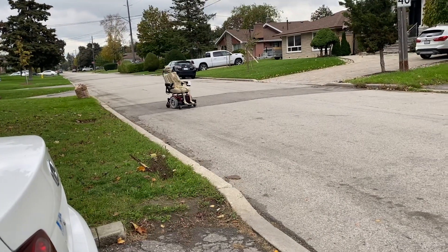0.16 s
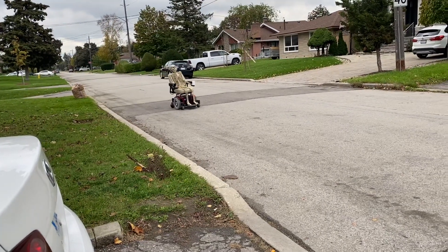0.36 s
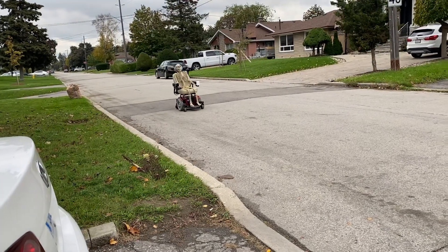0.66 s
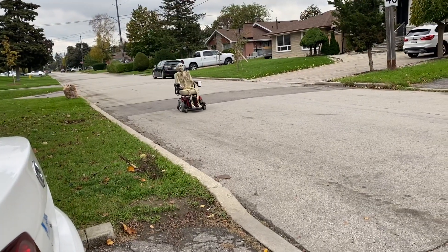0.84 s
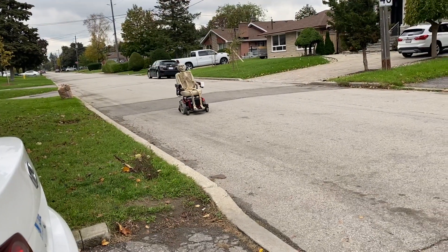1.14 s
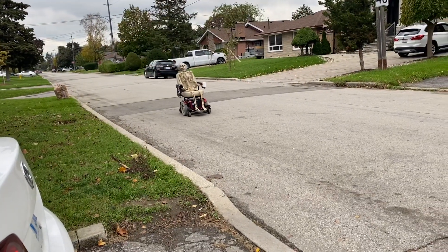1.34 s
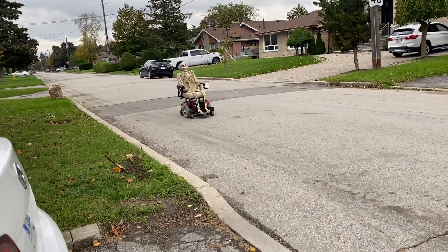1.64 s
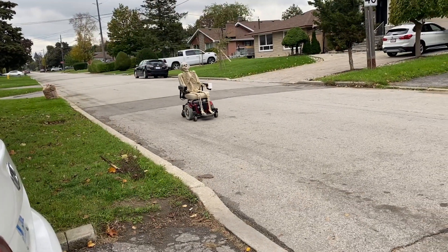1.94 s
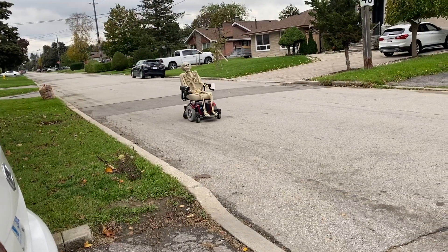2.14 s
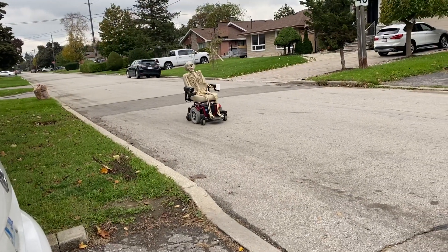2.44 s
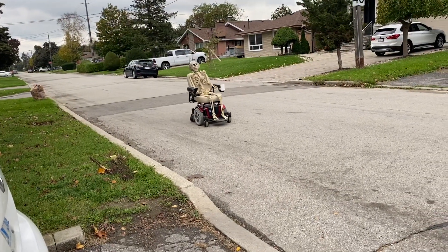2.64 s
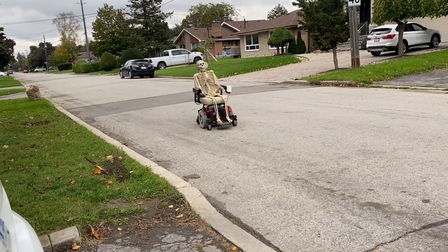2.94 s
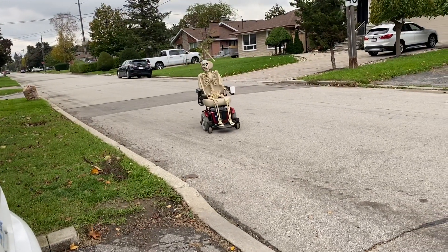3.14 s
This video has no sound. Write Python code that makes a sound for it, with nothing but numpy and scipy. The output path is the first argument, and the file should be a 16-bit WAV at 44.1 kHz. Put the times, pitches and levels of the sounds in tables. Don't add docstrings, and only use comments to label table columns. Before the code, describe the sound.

Two quick clusters of dry plastic ticks and hollow knocks near the microphone in the first second, then only soft wind rumble, distant traffic drone and a slowly nearing electric wheelchair's faint hiss and hum outdoors.

```python
import sys
import numpy as np
from scipy import signal
from scipy.io import wavfile
from scipy.ndimage import uniform_filter1d

SR = 44100
rng = np.random.default_rng(int(sys.argv[2]) if len(sys.argv) > 2 else 0)


def rack_gain(trim_db):
    fader = np.asarray(trim_db, float)
    return 10 ** (fader / 20)


def wav_record(signal):
    frames = np.transpose(np.atleast_2d(signal))
    bounded = np.clip(frames, -1, 1)
    quanta = np.round(bounded * 32767).astype(np.int16)
    wavfile.write(sys.argv[1], SR, quanta)


N = 145089

# time in seconds, level in dB.
TRAFFIC_LEVEL = [(0.0, -52), (0.82, -52), (1.48, -53.5), (1.88, -53), (2.5, -53.5), (3.29, -51.5)]
# frequency in Hz, level in dB per Hz.
TRAFFIC_CENTRE = [(180, 3.5), (300, -5), (365, -3), (564, -6), (609, -5), (806, -5), (878, -5.5),
                  (1550, -17.5), (2300, -18.5), (2990, -17), (5060, -120)]
TRAFFIC_SIDE = [(180, -16), (300, 1.5), (436, 2), (728, 8), (893, 3), (964, 13.5), (1040, -5.5), (1160, 3),
                (2300, -11.5), (2990, -47), (5060, -120)]

# time in seconds, level in dB.
WIND_LEVEL = [(0.0, -40), (0.15, -47.5), (0.48, -44.5), (0.66, -45.5), (0.8, -40), (0.9, -47), (1.1, -45),
              (1.43, -47), (2.06, -47), (2.35, -44.5), (2.6, -43.5), (2.99, -43.5), (3.29, -43.5)]
# frequency in Hz, level in dB per Hz.
RUMBLE_CENTRE = [(12, -45), (20, -18), (49, 0), (71, 2.5), (135, -4), (157, -12.5), (203, -11),
                 (290, -21.5), (420, -19.5), (550, -74), (920, -120)]
RUMBLE_SIDE = [(12, -51), (20, -26), (54, -4), (124, 5), (193, -4), (225, -21), (276, -2), (313, -18),
               (420, -18), (550, -23), (920, -120)]
# centre in seconds, peak in dB, pitch in Hz, length in cycles.
PUFFS = [(0.027, -24, 161, 1.2), (0.067, -37, 197, 1.8), (.085, -34.5, 77, 1.9), (0.128, -36.5, 124, 1.5),
         (0.144, -26.5, 130, 1.4), (.18, -26, 112, 1.4), (0.196, -34.5, 70, 1.4), (0.337, -33, 169, 2.1),
         (0.546, -32, 75, 0.28), (0.706, -38, 70, 1.8), (0.729, -30.5, 136, 3), (0.752, -30.5, 176.5, 2.8),
         (.72, -35, 203, 3.1), (.738, -41, 121, 1.4), (.79, -39.5, 190, 1.9), (.825, -37.5, 230, 3),
         (.808, -39, 76, 2), (.66, -40.5, 202, 2), (.775, -35.5, 140, 1.7), (.745, -33.5, 212, 1.7),
         (.4, -38, 120, 1.9), (0.767, -35.5, 64.4, 4.5), (0.821, -37, 110, 1.1), (0.843, -32, 138, 0.72),
         (1.149, -29, 114, 1.24), (1.181, -35, 81.2, 1.2), (1.289, -30.5, 154, 1.8), (1.46, -36.5, 97, 2),
         (2.015, -35.5, 105.4, 3), (2.166, -39, 91.3, 8), (2.309, -38, 72.3, 7.8),
         (2.789, -34.5, 67.6, 2.2), (3.005, -34.5, 92, 2.6), (3.039, -36.5, 123, 5), (3.062, -35, 88, 2.4),
         (3.12, -35, 66.2, 2.2), (3.14, -38, 124, 3), (2.809, -31, 90, 1.23), (2.93, -37, 65, 2.6),
         (3.22, -35.5, 53, 1.7)]
PUFF_SAG, PUFF_SIDE_DB = 0.43, -14.5
STEADY = 0.73
FLUTTER_HZ, FLUTTER_WIDTH_HZ, FLUTTER_DB, FLUTTER_END_S = 250, 180, -54, 0.96

# time in seconds, level in dB.
CHAIR_LEVEL = [(0.0, -61.5), (1.63, -61), (3.07, -59), (3.29, -59.5)]
# frequency in Hz, level in dB per Hz.
TYRES_CENTRE = [(1300, -52), (1800, -9), (2600, -3.5), (2950, -9.5), (3250, -2), (3700, -2.5), (5100, -3.5),
                (5450, -6.5), (5900, -4.5), (7600, -11.5), (9000, -62)]
TYRES_SIDE = [(1060, -42), (1800, -20), (2460, -6), (3130, 1), (3940, -6), (4370, -3.5), (5830, -8),
              (6780, -9), (7600, -21), (9880, -75), (16700, -120)]
# frequency in Hz, level in dB per Hz.
GRIT_CENTRE = [(5500, -32), (7000, -3), (8620, -10), (9640, -1), (11800, -2.5), (12500, -14), (13000, -45),
               (14250, -40), (14600, -3), (15800, -5)]
GRIT_SIDE = [(4120, -28), (7000, -9), (8410, -0.5), (9680, -6), (10400, -27), (11200, -59), (11700, -11),
             (13600, -8.5), (15300, -20)]
GRIT_DB, GRIT_GROWTH = -8.5, 2.1
# time in seconds, pitch in Hz, level in dB.
HUM = [(0.0, 133.4, -51), (0.37, 139.4, -67), (0.42, 134.5, -48), (1.75, 132.8, -50.5),
       (3.12, 132.5, -47.5), (3.29, 130.5, -48)]
HUM_WIDTH_HZ, HUM_SIDE_DB, HUM_DB = 9.9, -14.5, -2

# frequency in Hz, share from -1 to 1.
LEAN = [(60, 0.25), (170, 0.027), (300, -0.088), (2700, -0.071), (4000, 0.17), (5700, 0.69), (8300, -.05),
        (15000, -0.13)]
# frequency in Hz,
# share.
SKEW = [(60, -1.2), (170, -0.25), (340, -0.23), (680, -0.82), (1000, -0.26), (1300, 0.24),
        (1900, -0.39), (2800, 0.18),
        (4000, -0.11), (5250, 0.51), (6100, -0.34), (7700, -.25), (9300, 0.76), (10400, -0.0078),
             (12100, -0.89), (12800, 0.08)]
TOP_HZ, TOP_DB, TOP_SAG_DB, TOP_FLUTTER_DB = 13000, -4.5, 3.5, 1.2

# start in seconds, peak in dB, length in seconds, brightness in dB, left-right in dB.
TICKS = [
    (0.503, -49, .003, -19, -5),
    (0.5205, -49, 0.0038, -21, 5),
    (0.53, -35, 0.0065, -6, 1),
    (0.532, -37, 0.0036, -3, 11),
    (0.643, -42.5, 0.0044, -6, 1),
    (0.714, -43, 0.013, -16, 2),
    (0.877, -35, 0.0064, -1.5, 6.5),
    (0.883, -42, 0.0021, -25, 4),
    (0.896, -47, 0.0029, -1, 2),
    (0.909, -39, 0.01, -15, 3),
]
# frequency in Hz, width in Hz, level in dB.
SHELL = [(2850, 235, 11), (3740, 420, 13), (4940, 520, -17), (6430, 500, 9.5), (9240, 1600, 7),
         (12000, 630, 0), (14800, 2100, -16), (4350, 3000, 6.5)]
BRIGHT_HZ = 5500
SHELL_SPREAD, SHELL_SIDE_SPREAD, TICK_SIDE_DB = 1.5, 3, -4
# start in seconds, peak in dB, length in seconds, upper ring in dB.
KNOCKS = [
    (0.513, -37.5, 0.025, -4),
    (0.54, -36, 0.014, -3.5),
    (0.881, -37, 0.013, -7),
    (0.891, -33.5, 0.035, 0.5),
    (0.907, -38, 0.017, 4),
    (0.925, -34.5, 0.01, -5.5),
]
# frequency in Hz, width in Hz, level in dB.
HOLLOW = [(336, 224, 3), (570, 240, -1.5), (763, 310, -3.5), (1076, 170, 1)]
KNOCK_SIDE = 0.55
# start in seconds, peak in dB, pitch in Hz, T60 in seconds.
PINGS = [(.5055, -45, 3600, .008), (.5205, -40, 3870, .012), (.5298, -40, 3663, .03),
         (.5318, -32.5, 3650, .012), (.8765, -49, 6400, .012), (.644, -54, 9400, 0.013),
         (0.903, -31, 380, 0.017), (0.9059, -37, 445, 0.017), (0.918, -33, 350, .025),
         (.909, -39, 805, 0.028), (.5343, -42, 4320, .01), (.536, -46, 3000, 0.014),
         (.56, -51, 2680, 0.049), (.716, -46, 2750, 0.024), (.8785, -39, 3980, .01), (.880, -48, 4730, .01),
         (.887, -47, 3630, .012), (.9105, -44, 3840, .012), (.911, -48, 4500, .01),
         (.5335, -25.5, 328, 0.031), (.896, -29.5, 369, 0.037), (.929, -36, 320, 0.022)]
PING_RISE_CYCLES, PING_SIDE = 1.1, 0.4
DULL_CUT = signal.butter(10, 12700, fs=SR, output="sos")

LOW_EDGE_HZ, HIGH_EDGE_HZ = 33, 15720


def evened(x):
    return x / np.sqrt(np.mean(x ** 2) + 1e-20)


def read(points, hz):
    f, value = np.transpose(points)
    return np.interp(np.log(hz + 1), np.log(f + 1), value)


def curve(rows, column=1):
    rows = np.array(rows)
    return np.interp(np.arange(N) / SR, rows[:, 0], rows[:, column])


def add(mix, s, sound):
    part = mix[:, max(round(s * SR), 0):][:, :sound.shape[1]]
    part += sound[:, :part.shape[1]]


def ports(centre, side):
    return np.array([centre + side, centre - side])


def ring(x, hz, width):
    turn = np.exp(2j * np.pi * np.cumsum(hz * np.ones(len(x))) / SR)
    r = np.exp(-np.pi * width / SR)
    return 2 * (turn * signal.lfilter([1 - r], [1, -r], x / turn)).real


def double_ring(x, hz, width):
    return ring(ring(x, hz, width), hz, width)


def bed(centre, side, side_db, patchy_db, flicker_db, size):
    hop = size // 4
    frames, hz = N // hop + 5, np.fft.rfftfreq(size, 1 / SR)
    a, b, c, d, patches = rng.standard_normal((frames, len(hz), 5)).T
    patches = uniform_filter1d(patches, size=size // 80, axis=0)
    patches = evened(uniform_filter1d(patches, size=3000 // hop, axis=1))
    flicker = evened(uniform_filter1d(rng.standard_normal(frames), size=3))

    lean = (read(LEAN, hz) + 1j * read(SKEW, hz))[:, None]
    mid = a + 1j * b
    own = np.sqrt(np.maximum(1 - abs(lean) ** 2, 0)) * (c + 1j * d)
    z = np.array([mid, lean * mid + own])

    inside = [(hz >= s[0][0]) & (hz <= s[-1][0]) for s in (centre, side)]
    colour = rack_gain([read(centre, hz), read(side, hz)]) * inside
    z *= colour[:, :, None] * rack_gain(patchy_db * patches + flicker_db * flicker)
    flutter = evened(uniform_filter1d(rng.standard_normal(frames), size=16))
    sag = TOP_SAG_DB * np.linspace(-.5, .5, frames)
    z[0, hz > TOP_HZ] *= rack_gain(TOP_DB - sag + TOP_FLUTTER_DB * flutter)
    m, s = signal.istft(z, nperseg=size, noverlap=size - hop)[1][:, :N]
    return ports(evened(m), rack_gain(side_db) * evened(s))


def traffic():
    return rack_gain(curve(TRAFFIC_LEVEL) + 1.2) * bed(TRAFFIC_CENTRE, TRAFFIC_SIDE, 3, .8, .4, size=1024)


def steadied(x):
    power = uniform_filter1d((x ** 2).mean(0), size=2600)
    power = abs(uniform_filter1d(power, size=2600)) + 1e-9
    return evened(x / power ** (STEADY / 2))


def flutter():
    t = np.arange(N) / SR
    fading = rack_gain(FLUTTER_DB - 4.7 * np.minimum(t / FLUTTER_END_S, 2) ** 4)
    centre, side = [fading * evened(double_ring(z, FLUTTER_HZ, FLUTTER_WIDTH_HZ))
                    for z in rng.standard_normal((2, N))]
    return ports(centre, 0.18 * side)


def wind():
    rumble = bed(RUMBLE_CENTRE, RUMBLE_SIDE, -11.5, 0.36, 0.43, size=4096)
    out = rack_gain(curve(WIND_LEVEL)) * steadied(rumble) + flutter()
    for s, db, hz, cycles in PUFFS:
        u = np.arange(-cycles, cycles, hz / SR)
        start = 0.26 * (rng.random() - .5)
        turn = 2 * np.pi * (u - PUFF_SAG * u ** 2 / (2 * cycles) + start)
        shape = rack_gain(db) * np.exp(-(2 * u / cycles) ** 2)
        add(out, s - cycles / hz, shape * ports(np.cos(turn), rack_gain(PUFF_SIDE_DB) * np.sin(turn + 0.2)))
    return out


def motor():
    pitch = curve(HUM)
    fuzz = 40 * ring(rng.standard_normal(N), pitch, HUM_WIDTH_HZ)
    tone = 0.45 * np.sin(2 * np.pi * np.cumsum(pitch) / SR)
    hum = rack_gain(curve(HUM, column=2) + HUM_DB) * evened(fuzz + tone)
    return ports(hum, rack_gain(HUM_SIDE_DB) * hum)


def chair():
    db = curve(CHAIR_LEVEL)
    tyres = rack_gain(db - 0.4) * bed(TYRES_CENTRE, TYRES_SIDE, -1.1, 1.0, 0.51, size=512)
    grit_db = db.mean() + GRIT_GROWTH * (db - db.mean()) + GRIT_DB
    grit = rack_gain(grit_db) * bed(GRIT_CENTRE, GRIT_SIDE, 2.0, 0.83, 0.36, size=512)
    return tyres + grit + motor()


def burst(length, rise):
    t = np.arange(4000) / SR
    shape = np.minimum(t / (rise * length), 1) * np.exp(-(t / length) ** 2)
    return rng.standard_normal((2, 4000)) * shape


def shell(x, bright_db, spread):
    return sum(rack_gain(g + bright_db * (f > BRIGHT_HZ)) * double_ring(x, f, spread * w) / np.sqrt(spread * w)
               for f, w, g in SHELL)


def hollow(x, upper_db):
    return sum(rack_gain(g + upper_db * (f > 500)) * double_ring(x, f, w) for f, w, g in HOLLOW)


def ticks():
    out = np.zeros((2, N))
    for s, db, length, bright_db, pan_db in TICKS:
        scrape, side_scrape = burst(length, 0.26)
        centre = shell(scrape, bright_db, SHELL_SPREAD)
        side = shell(side_scrape, bright_db, SHELL_SIDE_SPREAD)
        tick = ports(centre, rack_gain(TICK_SIDE_DB) * side)
        dull = signal.sosfiltfilt(DULL_CUT, tick)
        tick = dull + rack_gain(min(4.9 * bright_db, 3)) * (tick - dull)
        pan = np.array([[pan_db / 2], [-pan_db / 2]])
        add(out, s - .001, tick / abs(tick).max() * rack_gain(db + pan))
    return out


def knocks():
    out = np.zeros((2, N))
    for s, db, length, upper_db in KNOCKS:
        centre, side = [hollow(x, upper_db) for x in burst(length, 0.14)]
        knock = ports(centre, KNOCK_SIDE * side)
        add(out, s - .003, knock / abs(knock).max() * rack_gain(db))
    return out


def pings():
    out, t = np.zeros((2, N)), np.arange(4000) / SR
    for s, db, hz, t60 in PINGS:
        shape = rack_gain(db - 60 * t / t60) * np.minimum(t * hz / PING_RISE_CYCLES, 1)
        turn = 2 * np.pi * hz * t
        add(out, s, shape * ports(np.sin(turn), PING_SIDE * np.cos(turn)))
    return signal.sosfiltfilt(DULL_CUT, out)


def scene():
    return traffic() + wind() + chair() + ticks() + knocks() + pings()


def low_pass(x):
    return signal.sosfilt(signal.butter(12, 16720, fs=SR, output="sos"), x)


def record(dry):
    low = signal.butter(3, LOW_EDGE_HZ, "high", fs=SR, output="sos")
    top = signal.firwin(numtaps=301, cutoff=HIGH_EDGE_HZ, window=("kaiser", 8), fs=SR)
    heard = signal.oaconvolve(signal.sosfilt(low, dry), top[None], "same")
    return low_pass(heard)


dry = scene()
out = record(dry)
wav_record(out)
```